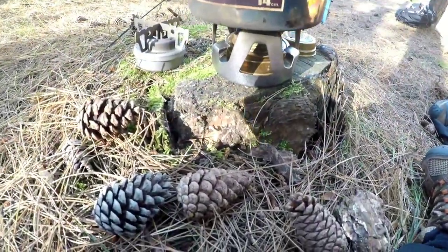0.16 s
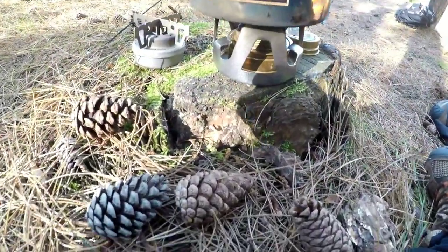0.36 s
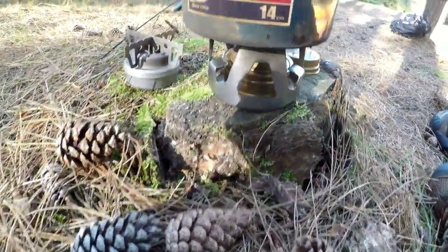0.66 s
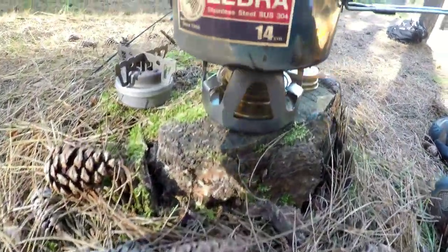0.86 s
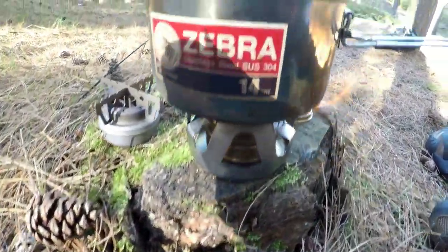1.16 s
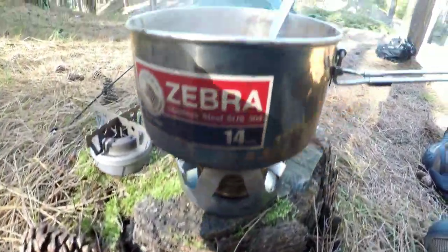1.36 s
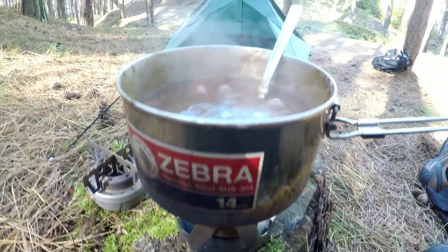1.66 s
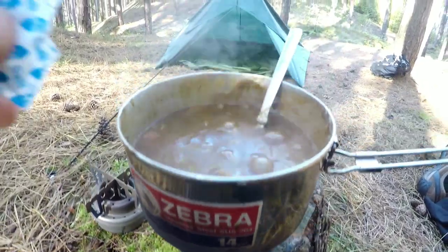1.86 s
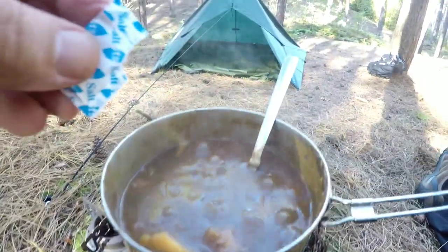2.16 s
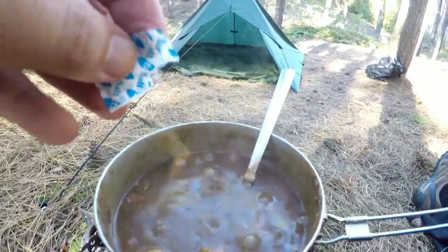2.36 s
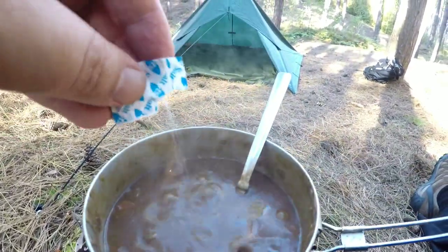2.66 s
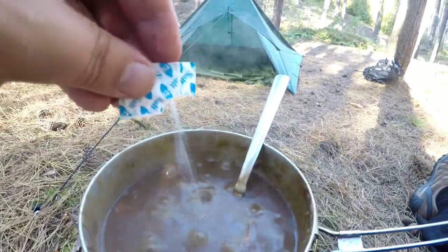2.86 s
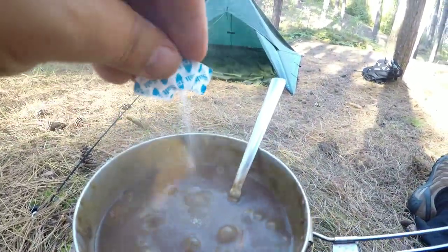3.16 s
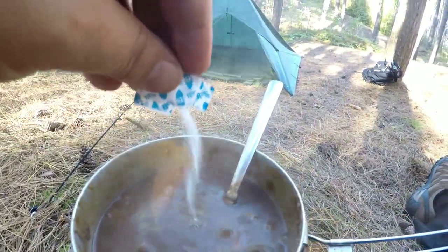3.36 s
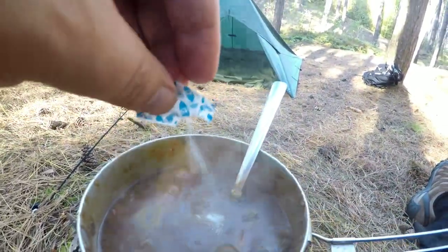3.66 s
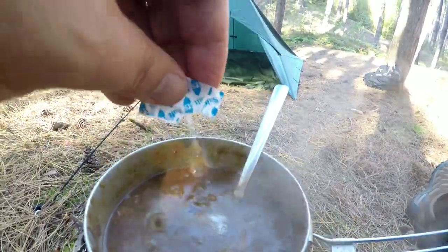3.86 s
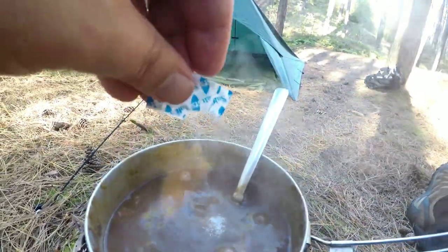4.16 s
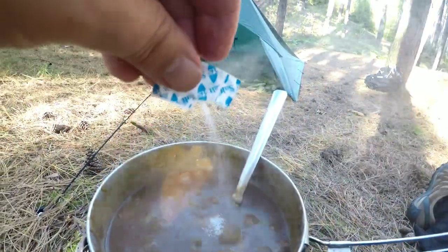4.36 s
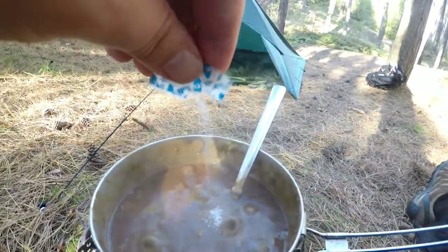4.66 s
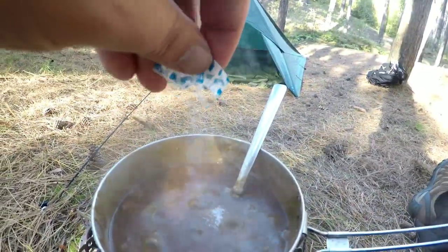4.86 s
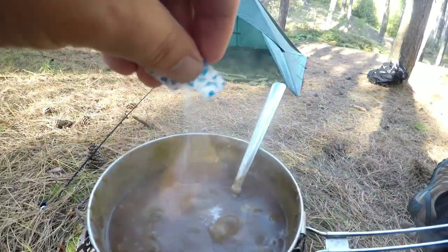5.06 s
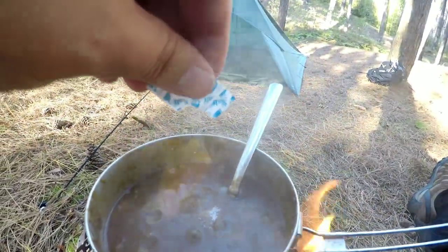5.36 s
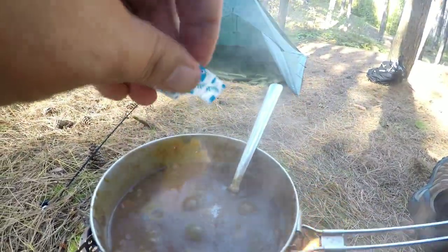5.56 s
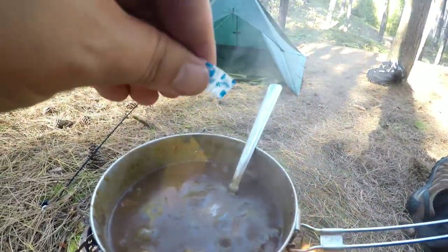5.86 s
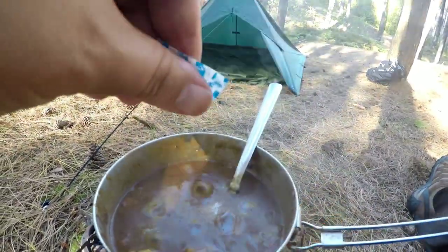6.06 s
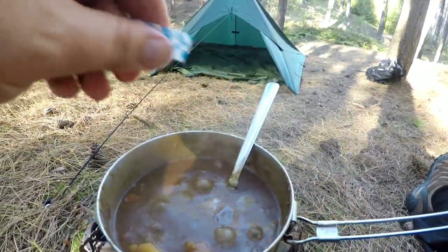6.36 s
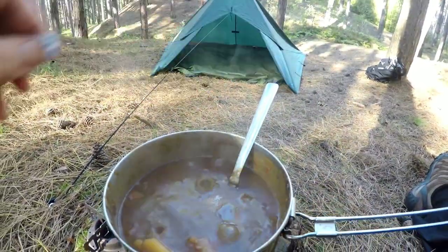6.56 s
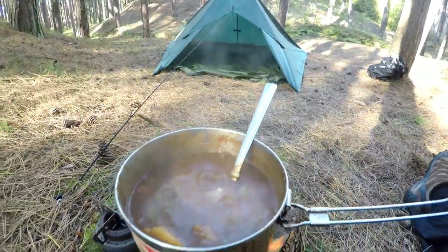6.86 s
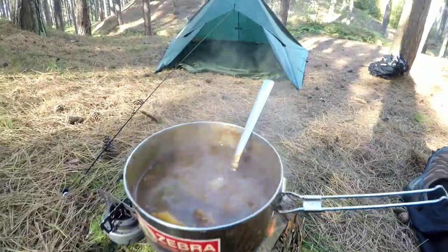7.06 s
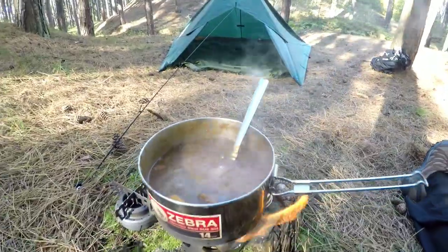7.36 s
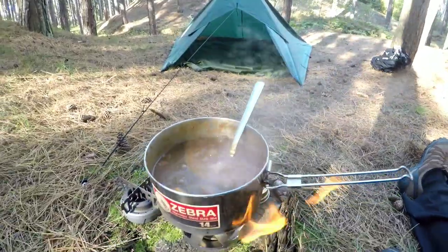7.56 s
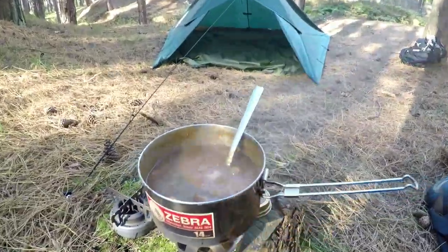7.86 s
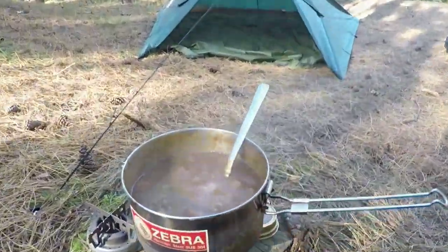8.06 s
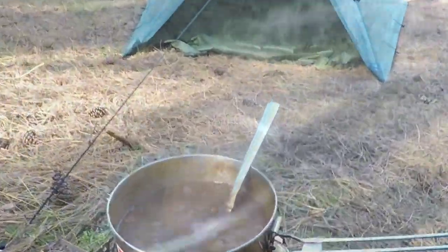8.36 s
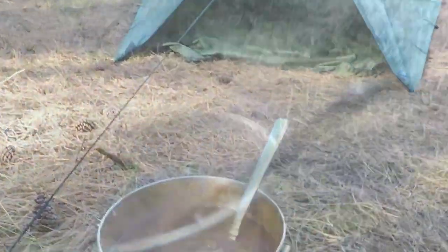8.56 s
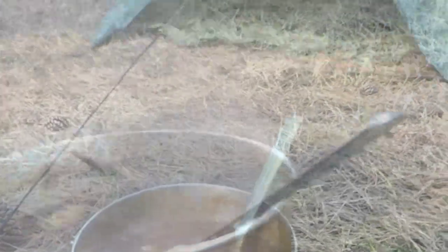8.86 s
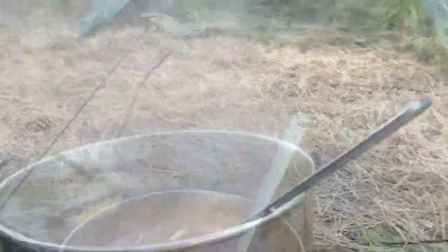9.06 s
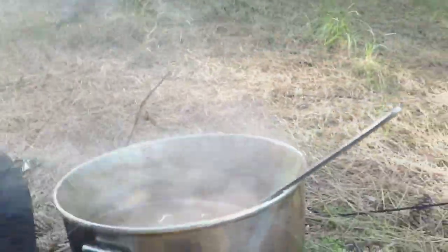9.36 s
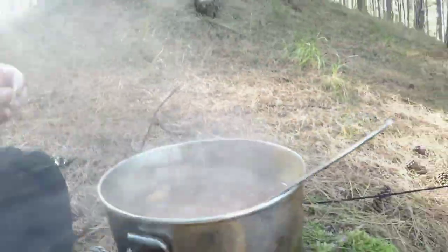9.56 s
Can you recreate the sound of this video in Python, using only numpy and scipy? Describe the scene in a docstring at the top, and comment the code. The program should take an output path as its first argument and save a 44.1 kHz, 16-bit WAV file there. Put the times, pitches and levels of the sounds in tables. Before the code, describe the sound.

Thick stew bubbles and spits close by while fingers crinkle a paper sachet; wind and flame rumble low, then knocks and a brief dropout.

```python
"""Thick stew boiling over a spirit flame

A pot of stew boils close by: plops and spits are swelling sine tones over a wash of filtered noise.
Fingers crinkle a paper sachet above it: noise bursts and swishes shaped by three resonances.
Wind, flame flutter and low knocks rumble beneath: lumpy low-passed noise and short low tones.
Near the end the sound drops to silence for a moment, then returns."""
import sys
import numpy as np
from scipy import signal
from scipy.fft import rfft, irfft, next_fast_len
from scipy.io import wavfile
from scipy.ndimage import uniform_filter1d, map_coordinates

SR = 44100
rng = np.random.default_rng(int(sys.argv[2]) if len(sys.argv) > 2 else 0)


def boost(x):
    """Linear amplitude factor 10**(x/20) for a level x in decibels (scalar or array-like)."""
    u = np.asarray(x, float) / 20
    return 10 ** u


def wrap_up_sound(samples):
    """Save the sound to the file named by the first command line argument, as 16-bit audio."""
    columns = np.atleast_2d(samples).T
    # keep every value between -1 and 1, then stretch to whole-number steps
    tamed = np.clip(columns, -1, 1)
    steps = np.round(tamed * 32767).astype(np.int16)
    wavfile.write(sys.argv[1], SR, steps)


N = 428211
T = np.arange(N) / SR  # s


def unit(x):
    """Normalisation: the signal is scaled to rms 1."""
    return x / np.sqrt(np.mean(x ** 2) + 1e-20)


def curves(rows):
    """Linear interpolation: one value per sample for each column after the time."""
    s, *columns = np.transpose(rows)
    return [np.interp(T, s, column) for column in columns]


def wobble(rate):
    """Spline interpolation of random knots, rate of them a second, gives a smooth random curve."""
    knots = rng.standard_normal(int(N * rate / SR) + 4)
    return map_coordinates(knots, [T * rate])


def noise():
    """White noise: independent Gaussian samples carry equal power at every frequency."""
    return rng.standard_normal(N)


def filtered(x, response):
    """Linear filtering: the spectrum is multiplied by a complex response of frequency."""
    size = next_fast_len(N + SR // 4)
    hz = np.fft.rfftfreq(size, 1 / SR)
    return irfft(rfft(x, size) * response(hz), size)[:N]


def coloured(x, spectrum):
    """Spectral shaping: x through (Hz, dB) points read on a log frequency axis, rms 1."""
    f, db = np.transpose(spectrum)

    def response(hz):
        return boost(np.interp(np.log(hz + 1), np.log(f), db, -120, -120))

    return unit(filtered(x, response))


def bubbles(s, db, hz, cycles, rough):
    """Damped oscillation: tones swell for some cycles and die; pitch climbs, rough ones lose their beat."""
    s, db, hz, cycles, rough = (np.reshape(v, (-1, 1)) for v in (s, db, hz, cycles, rough))
    start = np.floor(s * SR).astype(int)
    k = np.arange(int(min(8 * np.max(cycles / hz), .05) * SR))  # samples, 50 ms at most
    turns = np.maximum((start + k) / SR - s, 0) * hz
    age = turns / cycles  # 1 at the peak of the swell
    steps = uniform_filter1d(rng.standard_normal(age.shape), size=8, axis=1)
    drift = rough * np.sqrt(hz / SR) * np.cumsum(steps, axis=1)  # random walk of phase
    swell = (age * np.exp(1 - age)) ** 1.5
    tones = boost(db) * swell * np.sin(2 * np.pi * (turns * (1 + .02 * age) + drift))
    return np.bincount((start + k).ravel(), tones.ravel(), N + SR)[:N]


def swarm(surge, count, mid_hz, spread, cycles, rough, scatter_db):
    """Random superposition: many faint bubbles crowd in the surges, a few of them larger; rms 1."""
    crowd = np.cumsum(boost(2.5 * surge))
    s = np.interp(rng.random(count) * crowd[-1], crowd, T)
    hz = mid_hz * np.exp(spread * np.clip(rng.standard_normal(count), -2, 2))
    life = cycles * np.exp(.4 * np.clip(rng.standard_normal(count), -2, 2))
    db = scatter_db * np.minimum(rng.exponential(size=count), 3)
    return unit(bubbles(s, db, hz, life, rough))


# Gusts and a lull: middle t/s, half length/s, change of level/dB
WIND_CHANGES = [(0.127, 0.033, 3), (0.334, 0.11, 6.5), (1.637, 0.15, 6), (2.312, 0.047, 7),
                (2.779, 0.11, 10.5), (3.096, 0.047, 6.5), (3.222, 0.063, 14), (7.27, 0.21, 8.5),
                (7.76, .04, 5.5), (8.651, 0.13, 12.5), (9.301, 0.57, -2.5)]
# Spectral shape of wind noise: f/Hz, relative level per hertz/dB
WIND_SPECTRUM = [(12, -43), (26, 1.5), (40, 1.7), (60, -3.5), (110, -12), (160, -24.5), (300, -54)]


def wind():
    """Turbulent pressure: low noise buffets the microphone; gusts raise its level and a lull lowers it."""
    steady_db, edge = -31.5, 3.5  # steady level, dB rms; steepness of each rise and fall
    change_db = sum(db * np.exp(-np.abs((T - s) / half) ** edge) for s, half, db in WIND_CHANGES)
    lumps = boost(1.7 * wobble(18))
    return boost(steady_db + change_db) * coloured(lumps * noise(), WIND_SPECTRUM)


# Course of the flame: t/s, level/dB
FLAME_LEVEL = [(0, -40), (1, -38.5), (1.45, -42), (1.65, -39.5), (2.2, -41), (6.3, -40.5), (7.05, -41),
               (7.3, -38.5), (8.4, -39), (8.6, -35), (8.7, -26.5), (8.79, -34), (8.87, -44.5), (9.3, -42),
               (9.71, -36)]
# Spectral shape of flame noise: f/Hz, relative level per hertz/dB
FLAME_SPECTRUM = [(50, -47), (100, 2), (195, -4), (260, -12), (370, -20), (700, -28.5)]


def flame():
    """Amplitude modulation: the burner's flame is low noise whose strength flutters at random."""
    flutter = boost(2.6 * wobble(25))
    return boost(curves(FLAME_LEVEL)[0]) * coloured(flutter * noise(), FLAME_SPECTRUM)


# Handling knocks: t/s, peak level/dB, f/Hz, swell/cycles (held to 0.2-3)
KNOCKS = [(1.539, -24, 129, 0.44), (6.917, -26.5, 232, 0.71), (7.329, -11, 145, 0.18),
          (8.612, -6, 93, 0.56), (8.671, -11, 109, 0.53), (8.685, -5.5, 182, 0.55)]


def knocks():
    """Impulse excitation: each handling knock is a low tone that swells and dies within 50 ms."""
    s, db, hz, cycles = np.transpose(KNOCKS)
    return bubbles(s, db, hz, np.clip(cycles, .2, 3), rough=0)


# Resonances of the paper: f/Hz, width/Hz, gain at the centre/dB
PAPER_RESONANCES = [(6400, 2600, 7), (8120, 2150, 6), (11800, 2500, -20)]


def paper_response(hz):
    """Resonance: the sheet answers as a sum of band-passes, each applied twice."""
    return sum(boost(db) * (1j * hz * width / (centre * centre - hz * hz + 1j * hz * width)) ** 2
               for centre, width, db in PAPER_RESONANCES)


# Paper creases: t/s, burst level before the resonances/dB
CREASES = [(2.586, -46), (2.942, -33.5), (3.032, -37), (3.059, -44), (3.088, -30.5), (3.255, -35.5),
           (3.497, -41), (4.3847, -36), (4.5582, -43), (4.7357, -40), (4.94, -41), (5.04, -39),
           (5.1703, -40), (5.3868, -37.5), (5.479, -38), (5.6686, -41), (5.8158, -36), (6.168, -37),
           (6.3385, -40), (6.4344, -41), (7.3279, -29.5), (8.2228, -59), (8.6875, -41)]
# Finger slides on the paper: middle t/s, rms level at the middle/dB
SLIDES = [(2.39, -55), (3.0, -51), (3.062, -48), (3.33, -51), (4.4, -55), (4.83, -55), (5.05, -49.5),
          (5.18, -46.5), (5.5, -53), (5.61, -55), (5.72, -51), (5.86, -51), (5.9, -49), (6.05, -52),
          (6.099, -55), (6.18, -51)]


def sachet():
    """Excitation and resonance: creases snap as brief noise bursts, slides swish; both ring in the paper."""
    snaps = np.zeros(N)
    age = np.arange(SR // 100) / SR / 0.00067  # 1 at the burst's peak, 0.67 ms after its start
    for s, db in CREASES:
        burst = age * np.exp(1 - age) * rng.standard_normal(len(age))
        snaps[round(s * SR):][:len(age)] += boost(db) * burst
    slide = sum(boost(db) * np.exp(-.5 * ((T - s) / 0.012) ** 2) for s, db in SLIDES)
    return filtered(snaps, paper_response) + slide * unit(filtered(noise(), paper_response))


# Noise of the boil before its surges: t/s, simmer level/dB, sizzle level/dB, steam hiss level/dB
BOIL_LEVELS = [(0, -55, -61.5, -66.5), (1.3, -53.5, -57.5, -66), (2.4, -53, -59, -65),
               (3.05, -48.5, -55, -60), (3.6, -53, -58.5, -65), (5.9, -50, -59.5, -65),
               (6.4, -52, -59.5, -67), (7.25, -53, -61, -67.5), (7.38, -46.5, -58.5, -66),
               (7.8, -51.5, -59, -68), (8.5, -54, -63.5, -67.5), (8.75, -46, -57.5, -66),
               (8.87, -48.5, -66.5, -75), (9.05, -50.5, -66, -70), (9.3, -47, -61.5, -59.5),
               (9.5, -46, -60, -61.5), (9.71, -46, -60, -71)]
# Spectral shapes of the three noises: f/Hz, relative level per hertz/dB
SIMMER_SPECTRUM = [(200, 7), (370, 2.5), (650, 0), (1100, -3), (1700, -9), (2800, -14), (4000, -51)]
SIZZLE_SPECTRUM = [(1500, -7), (2800, 0.5), (3900, 5.5), (5100, -1), (6200, 5.5), (7500, -3.5), (9000, -8)]
HISS_SPECTRUM = [(5500, -56), (7500, -1), (8800, 1.5), (10100, 0.5), (11500, -7.5), (13200, -8.5),
                 (15400, -20), (16000, -75)]
# How far the faint bubbles stand out: t/s, plops level/dB, spits and fizz level/dB
BUBBLE_BALANCE = [(1.2, -2.5, -4), (2.1, -1, 1.5), (4.1, 1, 3), (4.6, 0, 1), (7.2, -2.5, 2),
                  (8, -6.5, -3.5), (8.8, 0.5, 0), (8.87, -7, -1.5)]


def boil_wash():
    """Superposition: smooth noise in three ranges, with a swarm of faint bubbles riding on each."""
    simmer_db, sizzle_db, hiss_db = curves(BOIL_LEVELS)
    plop_gain, spit_gain = boost(curves(BUBBLE_BALANCE))
    surge = wobble(22)  # the boil comes in small surges shared by all sizes
    plops = swarm(surge, count=600, mid_hz=1039, spread=.42, cycles=0.6, rough=0.069, scatter_db=2.5)
    spits = swarm(surge, count=600, mid_hz=3942, spread=.16, cycles=5.0, rough=0.19, scatter_db=2.5)
    fizz = swarm(surge, count=700, mid_hz=8630, spread=0.099, cycles=4.1, rough=0.27, scatter_db=1.0)
    simmer = coloured(noise(), SIMMER_SPECTRUM) + 0.95 * plop_gain * plops
    sizzle = coloured(noise(), SIZZLE_SPECTRUM) + 1.224 * spit_gain * spits
    hiss = coloured(noise(), HISS_SPECTRUM) + 0.46 * spit_gain * fizz
    wash = boost(simmer_db + 0.86 * surge) * simmer
    wash += boost(sizzle_db + 1.0 * surge) * sizzle
    wash += boost(hiss_db + 0.49 * surge) * hiss
    return wash


def splash(pops):
    """Convolution: drops fall back and the pot's wall answers, a noise tail decaying 60 dB in 20 ms."""
    age = np.arange(SR // 25) / SR
    rattle = rng.standard_normal(len(age)) * boost(-60 * age / 0.02) * (age > .0015)
    return boost(-7) * signal.fftconvolve(pops, rattle / np.linalg.norm(rattle))[:N]


# The loudest bubbles and spits: t/s, peak level/dB, f/Hz, swell/cycles (held to 0.3-6)
LOUD_BUBBLES = [(0.059, -38, 1500, .8), (0.474, -36, 2000, .4), (0.484, -30.5, 1700, 0.46),
                (0.568, -35.5, 6300, 5.6), (0.7408, -29, 1250, 0.5), (0.794, -32, 1500, .4),
                (0.884, -33.5, 2100, 0.51), (1.272, -37.5, 1220, 1.1), (1.5374, -28.5, 1060, 1.1),
                (1.754, -38, 1230, 1.2), (1.794, -32, 832, 0.53), (1.8938, -34, 3460, 2.9),
                (1.9713, -24, 5070, 0.64), (2.1824, -31, 1800, .55), (2.2213, -29, 830, 1.1),
                (2.246, -27, 630, 0.35), (2.2957, -21.5, 1010, 0.77), (2.3344, -32, 3670, 1.7),
                (2.413, -31, 3970, 2.2), (2.475, -32.5, 875, .8), (2.4938, -31, 3470, 1.1),
                (2.575, -35, 3550, 6), (2.588, -25.5, 5570, 0.88), (2.6197, -30, 887, 1.5),
                (2.7374, -26.5, 870, .57), (2.756, -28, 875, 1.3), (2.796, -30, 4260, 0.87),
                (2.8555, -23.5, 974, 1.6), (2.921, -27.5, 800, 0.73), (3.0724, -27, 4000, 0.7),
                (3.09, -19.5, 2000, .31), (3.0907, -20, 6220, 0.43), (3.111, -16.5, 1500, 0.31),
                (3.1125, -22.5, 2800, 1.4), (3.3177, -30, 3920, 1.4), (3.3293, -25.5, 1120, 0.95),
                (3.523, -26, 694, 0.86), (3.5816, -27, 3177, 0.8), (3.6055, -21, 1390, 0.24),
                (3.606, -20.5, 5100, 1.02), (3.6735, -26.5, 1090, 0.51), (3.865, -37, 980, 0.41),
                (3.8759, -26.5, 880, .57), (3.9042, -23.5, 5570, 0.54), (3.916, -27, 4940, .48),
                (4.0043, -30, 3730, 1.6), (4.046, -33, 1100, .45), (4.129, -37, 826, .4),
                (4.1426, -32, 980, 0.48), (4.1912, -27, 1040, .55), (4.204, -34, 910, .45),
                (4.255, -37, 1080, 0.78), (4.3278, -27.5, 960, 0.93), (4.418, -23.5, 790, 0.34),
                (4.4877, -23.5, 730, .57), (4.539, -31, 696, 0.5), (4.654, -36, 1100, 0.82),
                (4.7357, -23.5, 3170, 0.39), (4.94, -25, 6240, 1.2), (4.9632, -28.5, 800, .38),
                (5.1073, -21.5, 1350, 0.7), (5.186, -29.5, 3560, 0.59), (5.2534, -18.5, 1470, 0.34),
                (5.2693, -21.5, 1700, 0.61), (5.2728, -27.5, 5100, 1.9), (5.5041, -25, 5500, 0.88),
                (5.551, -34, 870, .7), (5.648, -35, 900, .8), (5.667, -26, 4450, .51),
                (5.776, -28, 4490, 0.82), (5.8787, -27.5, 1360, 0.85), (5.886, -22.5, 1290, 0.76),
                (5.9892, -32.5, 1100, 0.9), (6.042, -20.5, 4950, 0.34), (6.0183, -31, 920, 1.1),
                (6.239, -29, 900, 0.48), (6.439, -26, 1280, 0.95), (6.6248, -21.5, 970, 0.25),
                (6.6253, -22, 5040, 1.1), (6.9021, -32.5, 1210, 0.79), (7.0773, -31, 990, 1.7),
                (7.1657, -25, 1590, 0.2), (7.215, -28, 660, 0.33), (7.244, -27, 1520, 0.26),
                (7.3191, -24.5, 2000, 0.37), (7.328, -19, 770, 0.21), (7.329, -25, 3560, 0.45),
                (7.6473, -28.5, 1420, 0.45), (7.856, -30.5, 5750, 2.1), (8.2239, -25.5, 5960, 0.38),
                (8.478, -28.5, 5350, .69), (8.6778, -20.5, 735, 0.23), (8.6859, -31, 900, 0.34),
                (8.6884, -25.5, 2780, 0.3), (8.7169, -34, 2230, 0.7), (9.048, -42, 3350, 1.7),
                (9.156, -42, 3300, 1.6), (9.18, -42, 4200, 2.2), (9.331, -39.5, 3270, 1.8),
                (9.425, -38, 4100, 1.5), (9.474, -41, 4380, 1.3), (9.51, -41, 4260, 1.7),
                (9.575, -38, 3300, 1.4), (9.5852, -32, 4000, .61), (9.688, -28, 6320, .38)]


def loud_bubbles():
    """Bubble resonance: low tones of big bubbles ring clean, small ones hiss; each brings a splash."""
    s, db, hz, cycles = np.transpose(LOUD_BUBBLES)
    rough = 0.16 * np.clip(hz / 4000 - .4, 0, 1)
    pops = bubbles(s, db, hz, np.clip(cycles, .3, 6), rough)
    return pops + splash(pops)


def scene():
    """Free field: sources close by and in the open add up directly, with no room answer."""
    background = wind() + flame() + knocks()
    return (background + sachet() + boil_wash() + loud_bubbles())[None]


def top_cut(x):
    """Nothing passes above the cut-off."""
    return signal.sosfilt(signal.butter(12, 15820, fs=SR, output="sos"), x)


# Silence: start t/s, end t/s
SILENCE = (8.7996, 8.863)


def record(dry):
    """Low-pass and gating: the top is dull; sound cuts to silence and fades back in 3.7 ms."""
    def microphone(hz):
        return 1 / (1 + (hz / 15600) ** 16) * (hz < 15850)

    start, end = SILENCE
    gate = (T < start) + np.clip((T - end) / 0.0037, 0, 1)
    heard = filtered(dry[0], microphone) * gate
    return top_cut(heard[None])


dry = scene()
out = record(dry)
wrap_up_sound(out)
```